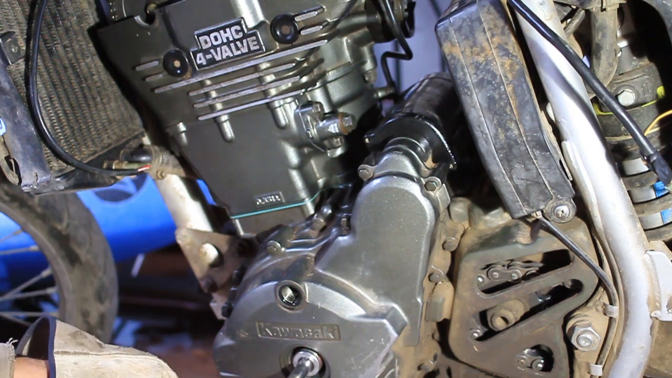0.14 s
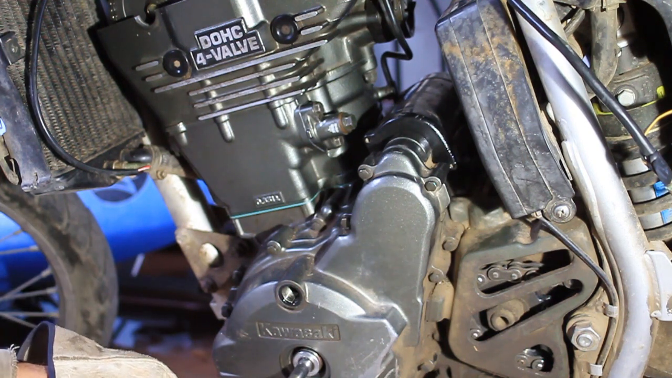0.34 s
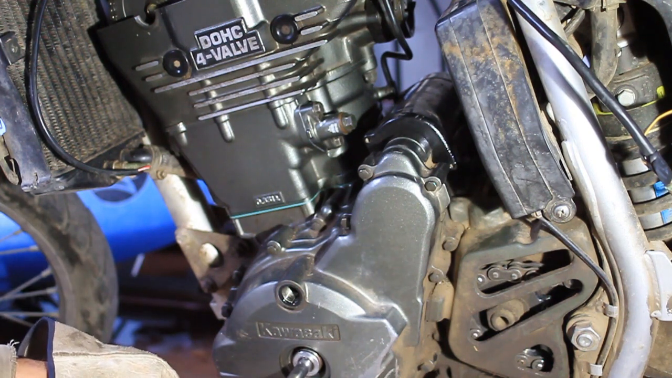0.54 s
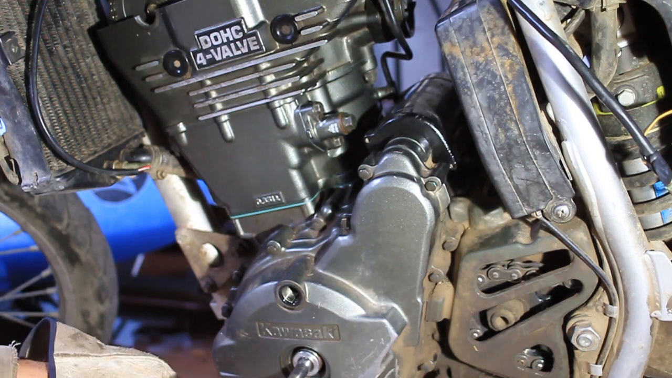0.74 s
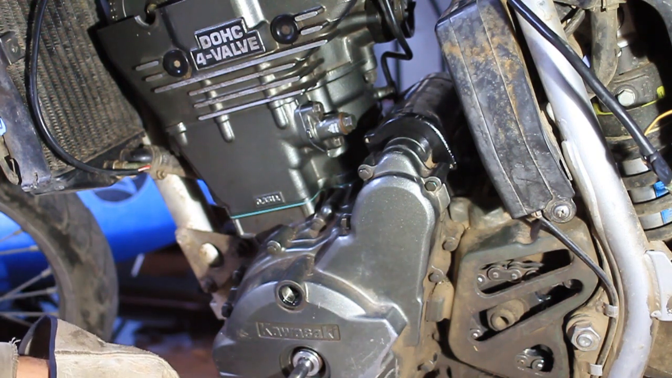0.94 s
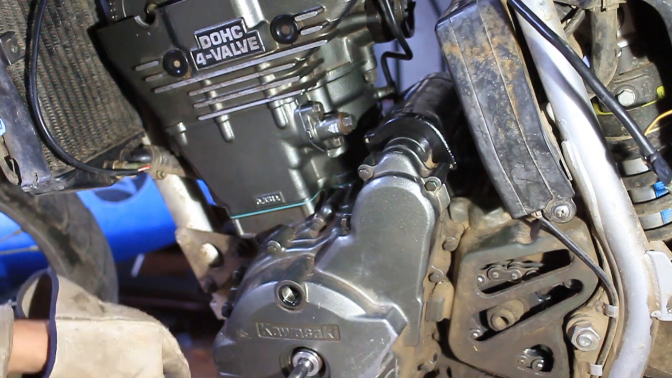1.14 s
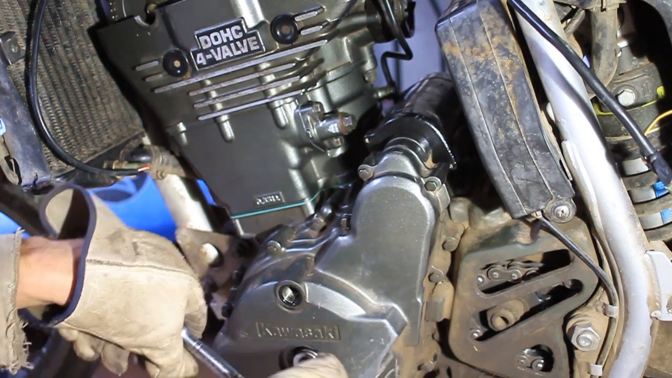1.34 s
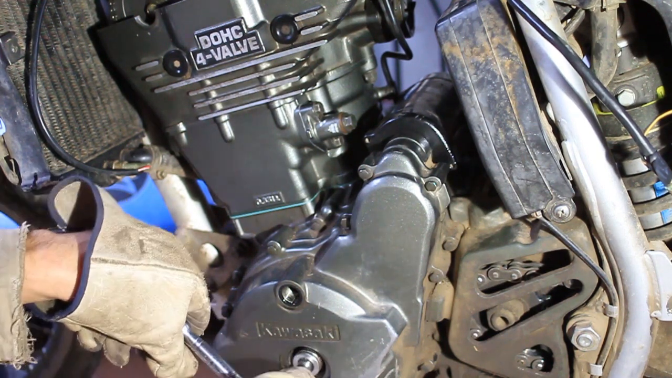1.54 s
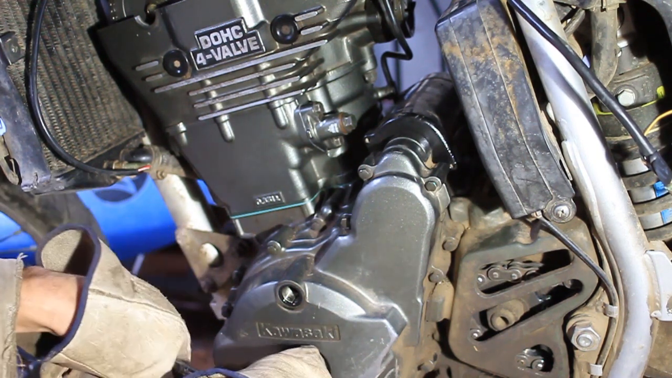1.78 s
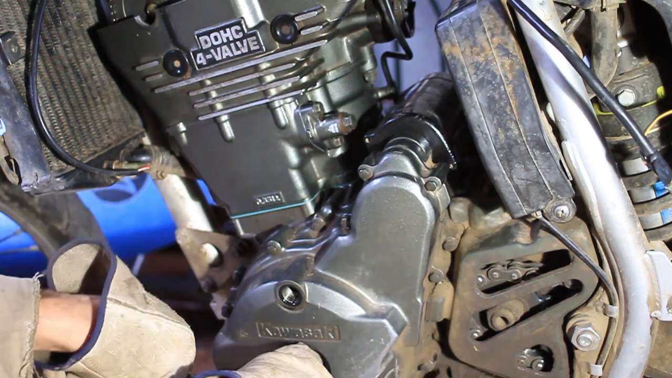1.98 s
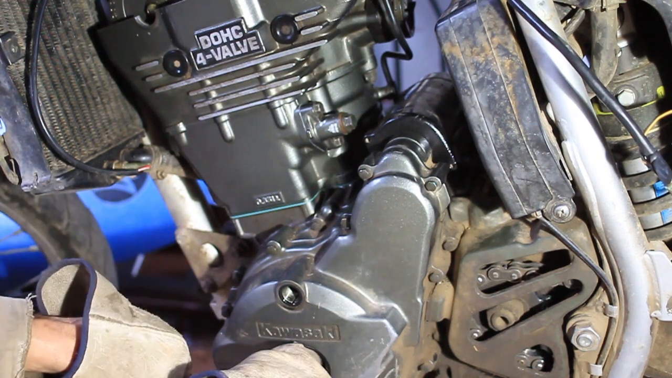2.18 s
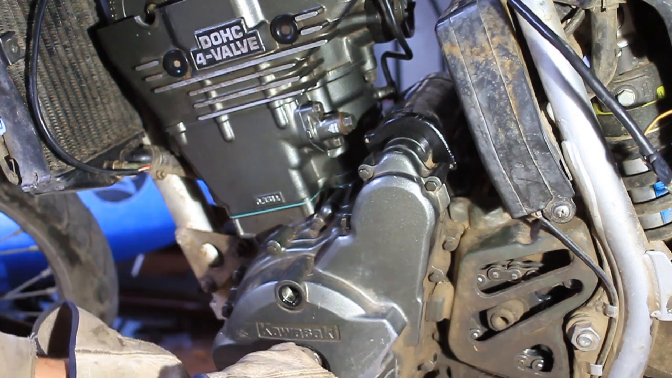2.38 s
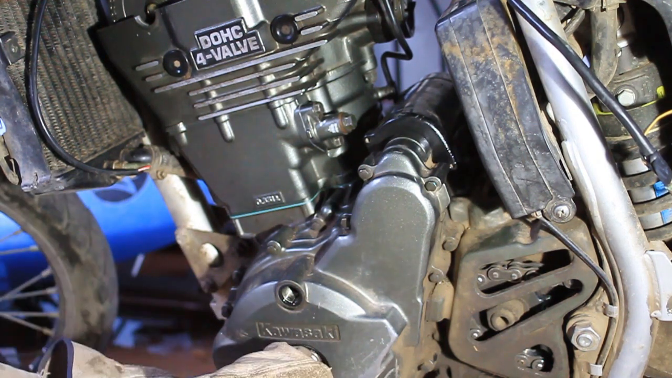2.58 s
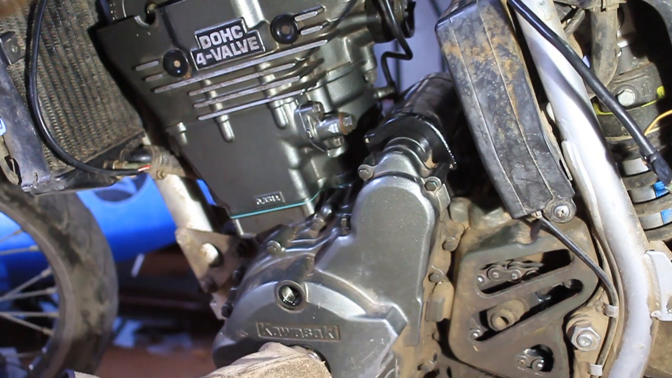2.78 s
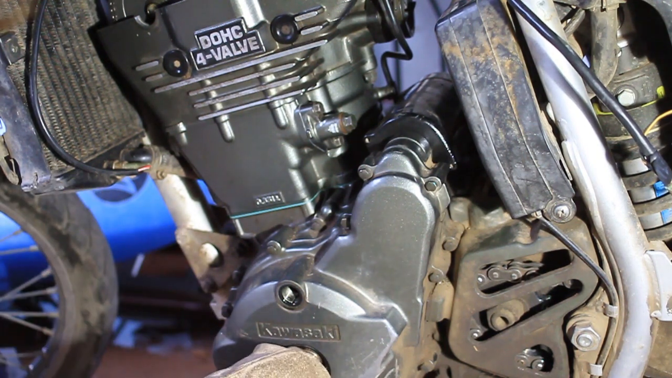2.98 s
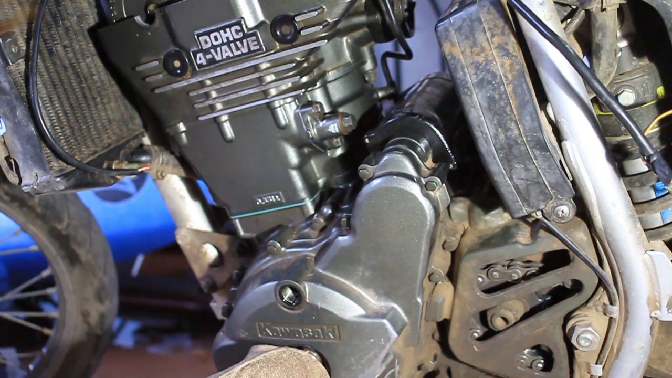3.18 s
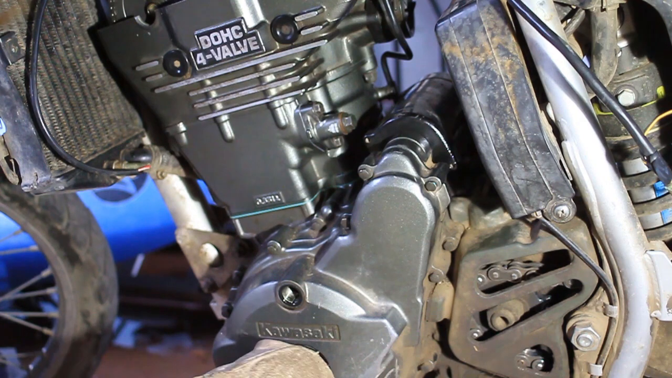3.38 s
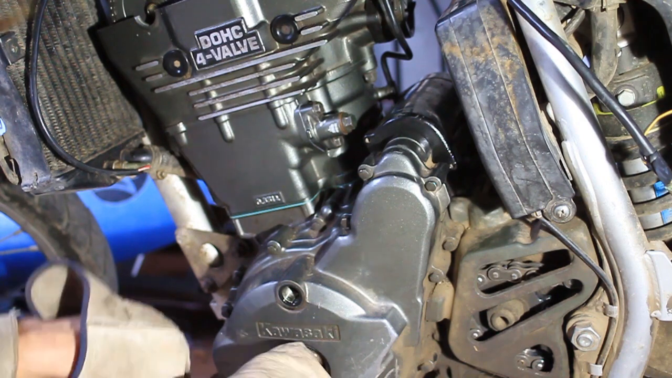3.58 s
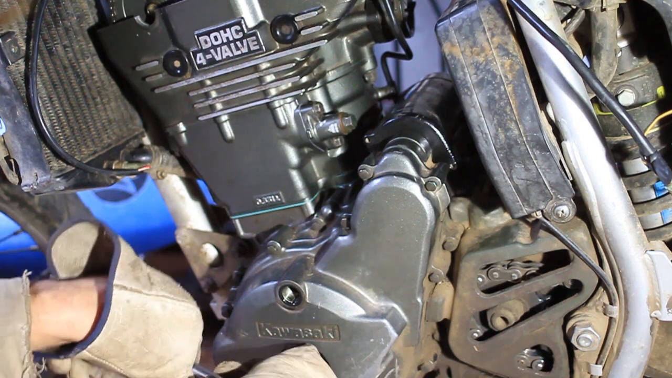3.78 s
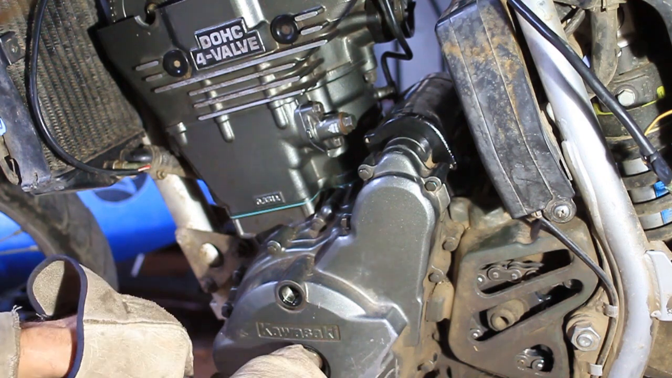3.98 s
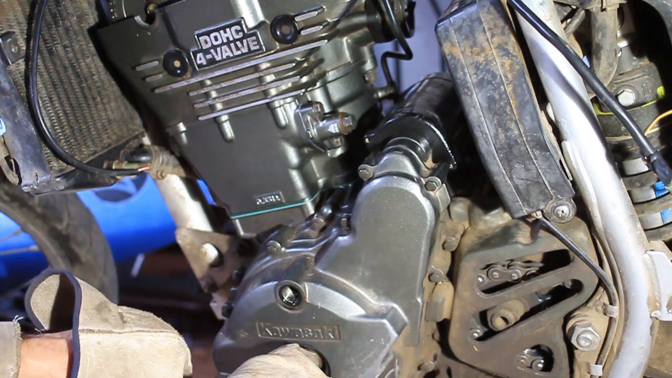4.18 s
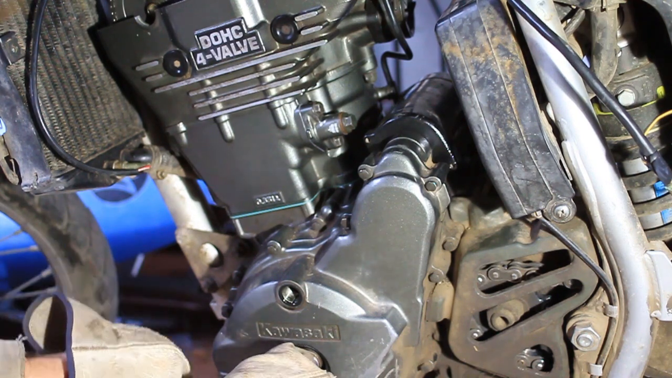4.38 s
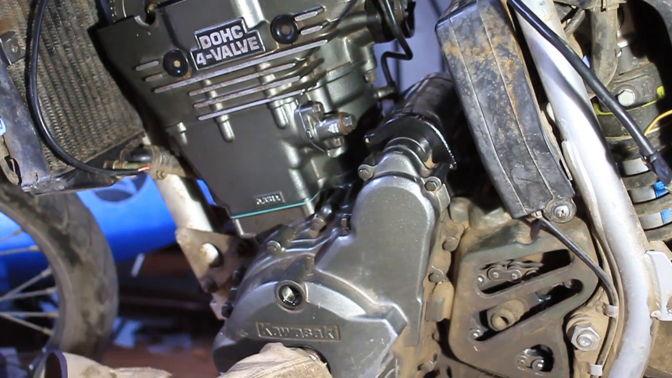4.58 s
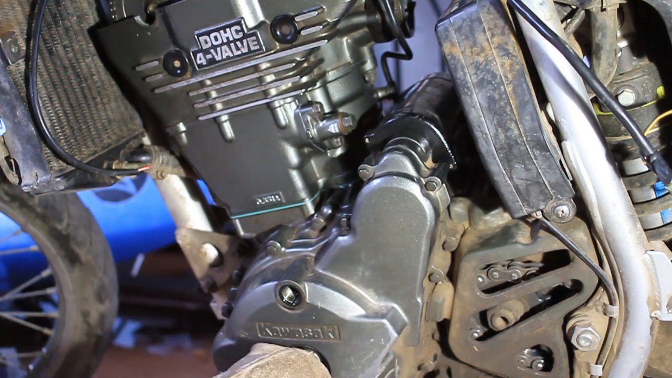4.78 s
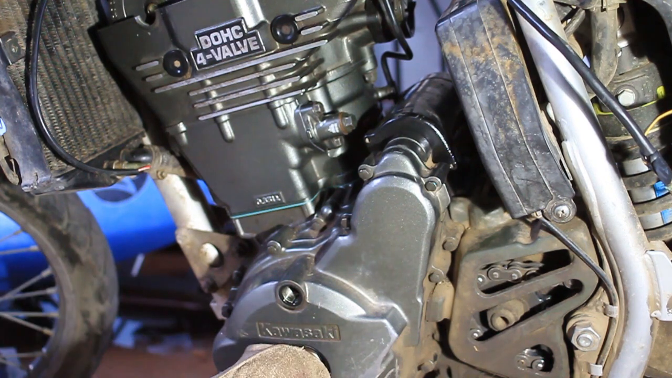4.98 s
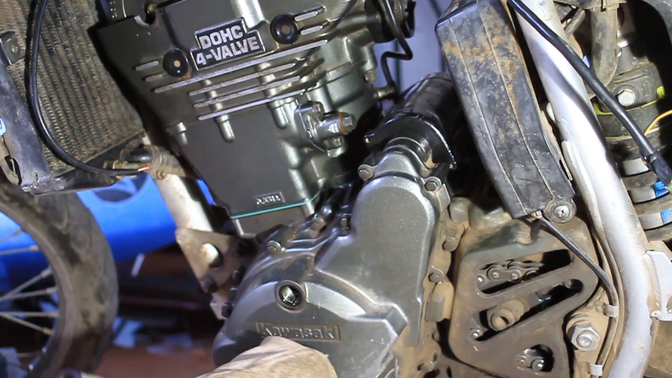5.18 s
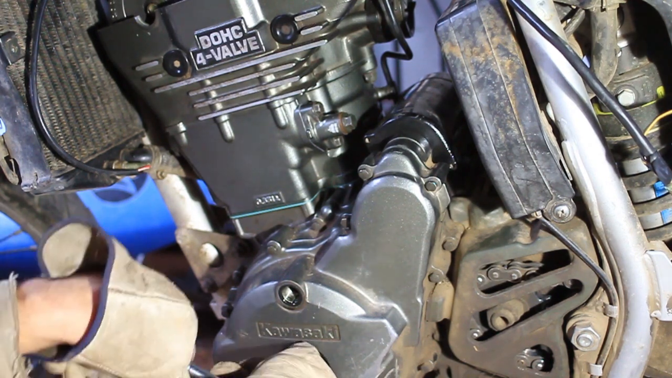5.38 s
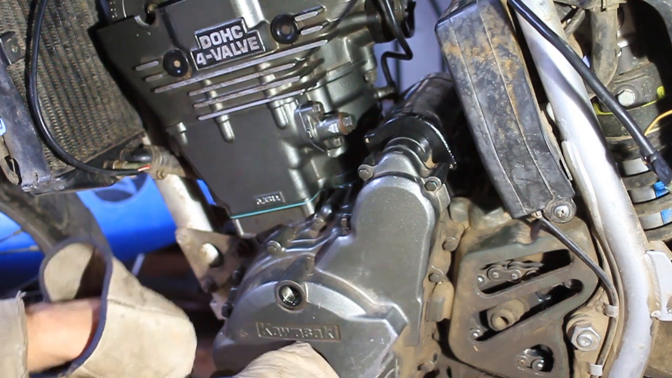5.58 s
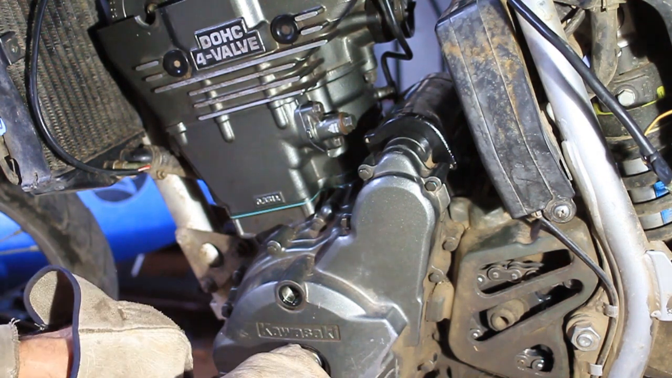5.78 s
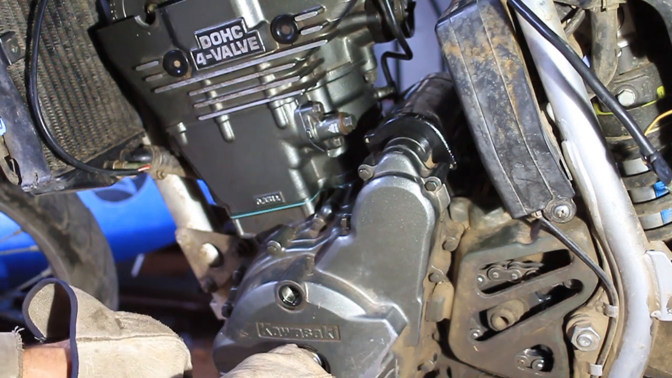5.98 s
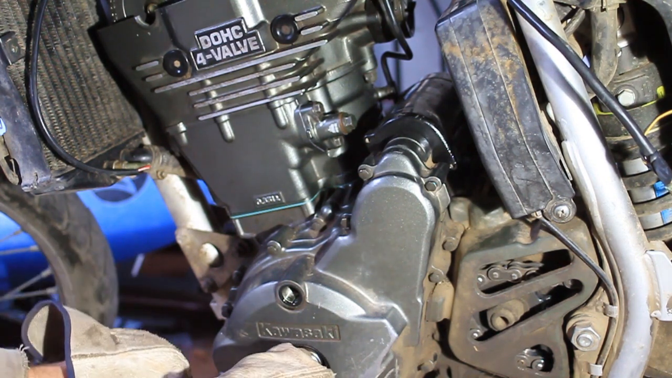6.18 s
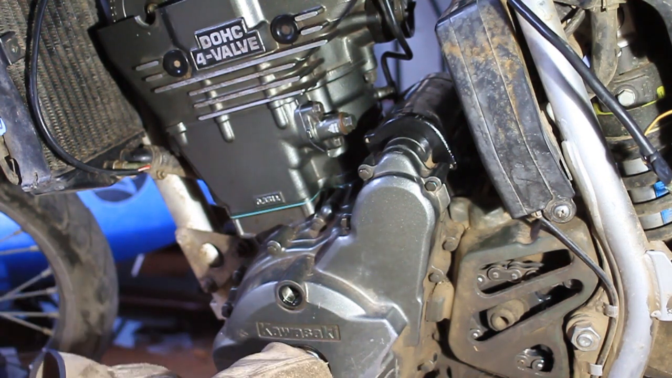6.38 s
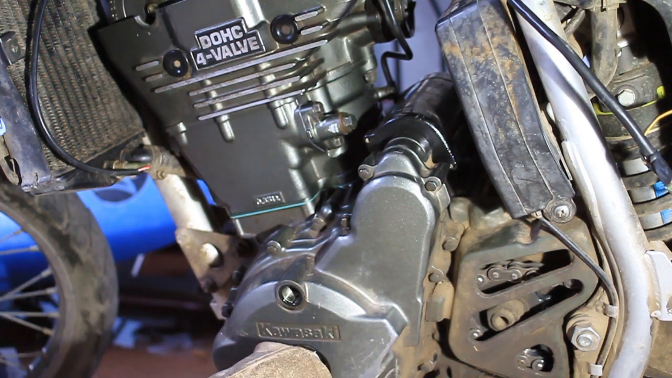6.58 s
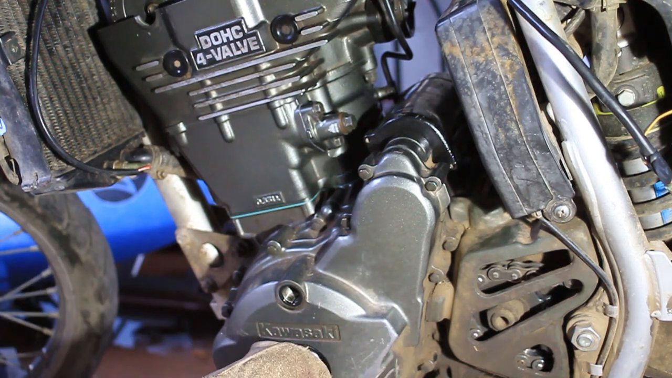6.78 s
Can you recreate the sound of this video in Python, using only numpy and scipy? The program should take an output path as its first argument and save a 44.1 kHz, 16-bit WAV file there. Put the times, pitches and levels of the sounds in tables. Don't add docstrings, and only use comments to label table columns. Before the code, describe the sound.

Soft far traffic rumble with slight microphone hiss runs throughout. From 0 s dry, gritty rubbing comes and goes as the engine turns, with tiny ticks around 0.7 s. At 1 s one loud, bright steel click snaps, followed from 1.1 to 1.5 s by about eight slower, quieter, uneven clicks. Scraping, a dull tap at 1.7 s and light ticks continue until about 3.2 s. A quick ratchet burst of eleven clicks runs from 3.5 to 3.75 s. Rubbing returns, with a tiny high dry squeak at 4.35 s. From 5.25 to 5.45 s the loudest rapid burst rises, and the level dips after it. A faint low motor hum enters at 5.5 s, a dull frame bump at 5.7 s, then a hard socket clack with short rattle at 5.85 s. Soft rubbing and ticks finish to 6.8 s. Close microphone, short garage echo.

```python
import sys
import numpy as np
from scipy import signal
from scipy.fft import rfft, irfft
from scipy.io import wavfile
from scipy.ndimage import minimum_filter1d

SR = 44100
rng = np.random.default_rng(int(sys.argv[2]) if len(sys.argv) > 2 else 0)


def amplitude_ratio(level_db):
    exponent = np.asarray(level_db, float) / 20
    return 10 ** exponent


def unload_wav(signal):
    wavfile.write(
        sys.argv[1],
        SR,
        np.round(np.clip(np.atleast_2d(signal).T, -1, 1) * 32767).astype(np.int16),
    )


N = 301644
TIME = np.arange(N) / SR

# time [s], peak level [dB], centre [Hz], spread [octaves]
KNOCK = (5.676, -22, 2200, 2.6)


def rms_one(x):
    return x / np.sqrt(np.mean(x ** 2) + 1e-20)


def at_peak(rows, peak_db):
    return rows * (amplitude_ratio(peak_db) / np.abs(rows).max(axis=1))[:, None]


def drift(rate_hz):
    r = np.exp(-2 * np.pi * rate_hz / SR)
    slow = signal.lfilter([1], [1, -2 * r, r * r], rng.standard_normal(N + SR))
    return rms_one(slow[SR:])


def envelope_db(start_s, length_s, start_db, end_db, rise_db_s, fall_db_s):
    end_s = start_s + max(length_s, 1e-4)
    hold_db = np.interp(TIME, [start_s, end_s], [start_db, end_db])
    rise_db = rise_db_s * np.maximum(start_s - TIME, 0)
    fall_db = fall_db_s * np.maximum(TIME - start_s - length_s, 0)
    return hold_db - rise_db - fall_db


def coloured(x, spectrum, peaks=()):
    hz = np.fft.rfftfreq(N, 1 / SR) + 1
    at_hz, level_db = np.transpose(spectrum)
    gain = amplitude_ratio(np.interp(np.log(hz), np.log(at_hz), level_db))
    gain = gain * (hz < 15850)
    for centre_hz, width_hz, top_db in peaks:
        offset = 2 * (hz - centre_hz) / width_hz
        gain = gain * (1 + (amplitude_ratio(top_db) - 1) / (1 + offset ** 2))
    return rms_one(irfft(rfft(x) * gain, N))


def contacts(count, rise_s, die_s):
    t = np.arange(768) / SR
    rise = (1 - np.exp(-t / np.reshape(rise_s, (-1, 1)))) ** 2
    bursts = rng.standard_normal((count, len(t))) * rise * np.exp(-t / die_s)
    return bursts / np.sqrt(np.sum(bursts ** 2, axis=1, keepdims=True))


def struck(modes, count, rise_s, die_s, scatter_db):
    out = np.zeros((count, 4096))
    for hz, level_db, t60_s in modes:
        r = amplitude_ratio(-60 / (t60_s * SR))
        w = 2 * np.pi * hz / SR
        force = contacts(count, rise_s, die_s)
        drive = np.abs(force @ np.exp(-1j * w * np.arange(force.shape[1])))
        drive = np.maximum(drive, 0.4)
        height = amplitude_ratio(level_db + scatter_db * rng.standard_normal(count)) / drive
        force = force * height[:, None]
        force = np.pad(force, ((0, 0), (0, out.shape[1] - force.shape[1]))) + 1e-18
        out += signal.lfilter([0.5, 0, -0.5], [1, -2 * r * np.cos(w), r * r], force)
    return out


def placed(times, bursts):
    out = np.full(N, 1e-18)
    for s, burst in zip(times, bursts):
        first = round(s * SR)
        out[first:first + len(burst)] += burst
    return out


def far_rumble():
    # frequency [Hz], level [dB per Hz]
    far_colour = [(18, -60), (30, -25), (59, -12.5), (251, -5), (294, -4.5), (335, -8), (735, -3),
                  (2270, -11), (3280, -19), (3830, -19), (4490, -21.5), (11800, -26), (15800, -34.5)]
    # centre [Hz], width [Hz], height [dB]
    drone = [(73.7, 8, 4.5), (100.3, 3.8, 7.5), (137.5, 10.8, 4.5), (211, 5.2, 2), (331.6, 4.4, 8),
             (463, 62, 5.5), (723.6, 10.3, 7), (1092, 150, 3)]
    # (time [s], level [dB])
    far_level = [(0, -44.5), (3.5, -45), (5.7, -44), (6.84, -45)]
    level_db = np.interp(TIME, *np.transpose(far_level)) - 0.5
    return amplitude_ratio(level_db) * coloured(rng.standard_normal(N), far_colour, drone)


def far_motor():
    start_s, hum_db, hum_hz, waver_hz = 5.52, -61, 176, 1.45
    level_db = envelope_db(start_s, N / SR, hum_db, hum_db, 100, 0) + 2.0 * drift(5)
    phase = 2 * np.pi * np.cumsum(hum_hz + waver_hz * drift(3)) / SR
    return np.sqrt(2) * amplitude_ratio(level_db) * np.sin(phase)


def washes():
    # (time [s], level [dB], time to fall by 60 dB [s])
    wash_starts = [
        (0, -51, 1),
        (5.839, -32, 0.4),
    ]
    # frequency [Hz], level [dB per Hz]
    wash_colours = [
        [(4120, -36), (7000, -10), (7460, -8), (10400, 11), (11700, -5), (12600, -12), (14000, -17)],
        [(2060, -45), (3500, -10), (3820, -19), (4950, 1), (5690, -12), (7850, -5), (8680, -11), (9910, 2),
         (11000, -12), (14600, -8), (15800, -25)],
    ]
    out = 0
    for (s, level_db, t60_s), colour in zip(wash_starts, wash_colours):
        closed = [(colour[0][0] / 2, -60)] + colour
        dying = amplitude_ratio(level_db - 60 * np.maximum(TIME - s, 0) / t60_s)
        out = out + (TIME >= s) * dying * coloured(rng.standard_normal(N), closed)
    return out


def rubbing():
    # start time [s], length [s], level at start [dB], at end [dB], bright
    # above dull part [dB]
    strokes = [(0, 0.25, -50.5, -59, 2), (.43, .24, -60.5, -56.5, -1), (0.68, 0.075, -53, -46.5, -7.5),
               (.76, 0.24, -49.5, -58.5, -6.5), (1.116, .08, -46.5, -61, -.1), (1.308, 0.14, -44, -66, -3),
               (1.56, 0.087, -58, -44, 0.5), (1.669, .15, -40, -55.5, -1), (1.846, 0.11, -46.5, -57, -2.3),
               (1.956, .15, -55.5, -49, -5), (2.292, 0.087, -57.5, -45.5, -3), (2.42, 0.16, -52, -51.5, -6),
               (2.625, .15, -51.5, -53, -5.5), (2.794, 0.39, -52.5, -50, -4), (3.8, 0.088, -65, -54.5, -1),
               (4.12, 0.07, -54, -56.5, -2.5), (4.39, .27, -47.5, -48, -3.5),
               (4.661, 0.26, -48.5, -43, -6.5), (5.514, 0.13, -47, -53, -18), (6.032, 0.27, -64, -49.5, -3),
               (6.304, 0.12, -51.5, -52.5, -4.5), (6.47, 0.34, -51, -50.5, -5.5),
               (0.332, 0.015, -51, -56, 1),
        (3.41, 0.14, -63, -56, .1),
        (5.075, .04, -62, -60, -1.5),
        (5.18, 0.075, -58, -54, -5),
        (5.72, 0.055, -55, -64, -6),
    ]
    # frequency [Hz], level [dB per Hz]
    dull_rub = [(350, -26), (600, -28), (638, -2), (1100, 2.5), (1750, -2), (2750, -2.5), (3480, -2),
                (4060, -0.5), (7000, -19.5), (9100, -45.5), (15400, -120)]
    bright_rub = [(2940, -43.5), (5000, 0.5), (6420, -1.5), (7140, -2), (8090, -3), (12100, -1.5),
                  (15100, -11), (15800, -14)]
    # centre [Hz], width [Hz], height [dB]
    casing = [(2700, 150, 6), (3140, 120, 4), (3760, 90, 6), (4600, 100, 5), (6550, 50, 9), (7590, 120, 5),
              (8280, 150, 3), (9540, 80, 6), (10300, 200, 5)]
    moves = strokes
    grip_on_db_s, let_go_db_s = 350, 171.5
    moves_db = np.array([envelope_db(*move[:4], grip_on_db_s, let_go_db_s) for move in moves])
    dull_db = moves_db.max(axis=0)
    bright_db = (moves_db + np.array(moves)[:, 4:]).max(axis=0)
    grip = drift(29.2)
    slips_db = 2.0 * np.minimum(rng.exponential(1, (2, N)), 5)
    grit = rng.standard_normal((2, N)) * amplitude_ratio(slips_db)
    dull_gain = amplitude_ratio(dull_db + 1.64 * grip + 0.19 * drift(12))
    bright_gain = amplitude_ratio(bright_db + 0.74 * grip + 1.9 * drift(22))
    dull = dull_gain * coloured(grit[0], dull_rub, casing)
    bright = bright_gain * coloured(grit[1], bright_rub, casing)
    return dull + bright


def squeak():
    start_s, level_db, hz, width_hz = 4.358, -51, 7530, 90
    narrow = signal.iirpeak(hz, hz / width_hz, fs=SR)
    tone = signal.lfilter(*narrow, rng.standard_normal(N))
    tone = signal.lfilter(*narrow, tone)
    return amplitude_ratio(envelope_db(start_s, 0, level_db, level_db, 570, 140)) * rms_one(tone)


def ticks():
    # time [s], peak level [dB], centre [Hz], spread [octaves]
    dull_ticks = [(0.9796, -6.5, 4150, 0.59), (0.7103, -34, 1830, 1.7), (0.7435, -27.5, 4980, 1),
                  (1.6697, -17.5, 3900, 0.74), (1.705, -27, 1640, 1.1), (2.0418, -35, 3930, 0.84),
                  (2.3147, -37, 2760, 1.2), (3.5058, -20.5, 1900, 2.6), (3.8898, -36, 1810, 1.2),
                  (4.42, -33, 2880, 1.2), (4.793, -35, 3150, 1.1), (4.9094, -34, 3710, 1.4),
                  (5.1093, -31.5, 1570, 1.2), (5.6527, -31.5, 1640, 0.49), (6.3082, -32, 2260, 1.7),
                  (6.35, -33.5, 2850, 1.8)]
    bright_ticks = [(0.6884, -29, 6160, 1.2), (1.5798, -43, 6900, 1.2), (2.107, -34, 6560, 2.2),
                    (2.5311, -38, 10300, 1.2), (2.6233, -36, 6560, 1.4), (4.3794, -38, 7610, 1.01),
                    (4.4557, -32.5, 6550, 1.6), (4.536, -38, 7710, 0.85), (4.6374, -30, 10300, 1),
                    (4.9791, -33.5, 13500, 1.01), (5.0799, -40, 6900, 1.4), (5.676, -39, 10900, 1.9),
                    (6.124, -42, 7450, 1.2), (6.1439, -42, 12500, 1.2), (6.2193, -36.5, 6700, 1.2),
                    (6.4894, -38, 5720, 1.5), (6.6667, -41, 12900, 1.04), (6.684, -28.5, 12900, 0.34)]
    rows = [(*tick, 0.0019) for tick in dull_ticks]
    rows += [(*KNOCK, 0.006)]
    rows += [(*tick, 0.003) for tick in bright_ticks]
    puffs = []
    for s, peak_db, hz, octaves, die_s in rows:
        edges = hz * 2 ** (np.clip(octaves, 0.1, 3) * np.array([-0.5, 0.5]))
        edges = np.clip(edges, 200, [15000, 15700])
        band = signal.butter(2, edges, "band", fs=SR, output="sos")
        puff = signal.sosfilt(band, contacts(1, 0.000067, die_s)[0])
        puffs.append(amplitude_ratio(peak_db - 1.5) * puff / np.abs(puff).max())
    return placed(np.array(rows)[:, 0], puffs)


def frame_knock():
    # pitch [Hz], level [dB], time to fall by 60 dB [s]
    frame_modes = [(720, -3, .03), (1030, 0, .03), (2010, -2, .025), (2900, -6, .01), (3800, -5, .01)]
    ring = struck(frame_modes, 1, 0.002, 0.004, scatter_db=0)
    return placed([KNOCK[0]], at_peak(ring, np.array([-25])))


def socket_seat():
    # (time [s], peak level [dB])
    jumps = [
        (5.8356, 1),
    ]
    seat_hz = [2600, 3300, 4350, 5000, 5900, 7200, 8100, 9500, 10050, 10800, 11600, 12200, 12800, 13400,
               14000, 14700]
    # level [dB], time to fall by 60 dB [s]
    seat_modes = [(-9, 0.005), (-6, 0.005), (-9, 0.016), (-1.5, 0.028), (-20, 0.0081), (-12, 0.012),
                  (-13, .008), (0, 0.016), (-18, 0.016), (2, 0.0054), (6, 0.016), (-7, 0.0081), (1, 0.01),
                  (-10, .008), (-6, .009), (-15, 0.0069)]
    s, peak_db = np.transpose(jumps)
    modes = [(hz, *mode) for hz, mode in zip(seat_hz, seat_modes)]
    blow = at_peak(struck(modes, len(s), 0.0004, 0.00071, 0), peak_db + 0.18)
    rattle = at_peak(struck(modes, len(s), 0.0013, 0.0026, 0), peak_db - 6.5)
    return placed(s, blow + rattle)


def ratchet():
    # time [s], peak level [dB], handle ring from the peak [dB]
    swings = [
        [(0.9802, 3.2, -9.5)],
        [(1.1298, -17.5, -2.5), (1.189, -34, 10), (1.2271, -30.5, 4), (1.29, -31, -1), (1.3239, -16, -14),
         (1.3654, -14, -16.5), (1.401, -14.5, -18.5), (1.4373, -12, -25), (1.5424, -30.5, -50)],
        [(3.5057, -11, -22), (3.5299, -10, -26), (3.5505, -13.5, -22), (3.5718, -11.5, -24), (3.5917, -17, -25),
         (3.612, -14, -30), (3.6352, -14, -32), (3.6576, -14, -32), (3.6809, -15.5, -24), (3.7071, -21, -28),
         (3.7562, -24, -29)],
        [(5.237, -8.5, -27), (5.2617, -7.5, -50), (5.2824, -5.5, -53), (5.3007, -2, -56), (5.3188, -2.5, -56),
         (5.3374, 1.5, -52), (5.3557, 3, -56), (5.3757, 1.5, -60), (5.3978, 3.5, -50), (5.4235, 3, -56),
         (5.462, 1.8, -52)],
    ]
    # level at first tooth [dB], at last tooth [dB]
    grips = [
        [(-14.5, -21), (-1.5, -8), (-8.5, -13)],
        [(-6, -27), (-1.5, -20), (-12, -27.5)],
        [(-28, -21), (-4.5, -25), (-9.5, -25)],
        [(-18, -17.5), (-15, -16), (-9, -16.5)],
    ]
    part_hz = [
        [4070, 4200],
        [7472, 7590],
        [9780, 9950, 10150, 10350],
        [11480, 11660, 11880, 12080],
    ]
    # level [dB], time to fall by 60 dB [s]
    part_modes = [
        [(1.5, 0.035), (-1.5, 0.02)],
        [(-4.3, 0.037), (-2.4, 0.018)],
        [(-5, 0.0083), (-1.5, 0.016), (-2.5, .02), (-1.5, .015)],
        [(-24.5, .015), (3, 0.017), (-13, 0.06), (0, 0.011)],
    ]
    head_hz = [1750, 2450, 3200, 4650, 5250, 6200, 7000, 8300, 9100, 10800, 12700, 13800, 15070, 15450]
    # time to fall by 60 dB [s], levels on swings 1-4 [dB]
    head_modes = [(0.0055, -44, -29, -13, -24.5), (0.0055, -14, -45, -33, -10.5),
                  (0.0087, -11, -34, -29, -23), (0.0046, -14, -35, -12.5, -21),
                  (0.0065, -15, -34, -14, -9.5), (0.0099, -36, -14, -11.5, -15),
                  (0.01, 1.5, -19, -14, -9.5), (0.0084, -24, -13, -12, -10.5), (0.005, -22, -22, -24, -30),
                  (0.0017, 2, 3.5, -13, -6), (0.0036, -46, -13, -21, -16), (0.0133, -34, -19, -19, -25),
                  (.024, 0, -25, -14, -37), (.01, -28, -22, -27, -18)]
    contact_rise_s, contact_die_s = [0.001, 0.00031, 0.00025, 0.00025], 0.00094
    s, peak_db, handle_db = np.transpose(np.concatenate(swings))
    swing = np.repeat(np.arange(len(swings)), [len(teeth) for teeth in swings])
    grip_db = [np.linspace(*np.transpose(grip), len(teeth)) for grip, teeth in zip(grips, swings)]
    grip_db = np.concatenate(grip_db)
    modes = []
    for hz, (t60_s, *level_db) in zip(head_hz, head_modes):
        modes.append((hz, np.array(level_db)[swing], t60_s))
    for freedom_db, pitches, part in zip([handle_db, *grip_db.T], part_hz, part_modes):
        for hz, (level_db, t60_s) in zip(pitches, part):
            modes.append((hz, freedom_db + level_db + 8.5, t60_s))
    rise_s = np.array(contact_rise_s)[swing]
    snaps = struck(modes, len(s), rise_s, contact_die_s, scatter_db=0.0)
    return placed(s, at_peak(snaps, peak_db + 1.0))


def garage(x):
    # (delay time [s], level [dB])
    bounces = [
        (.0038, -11.5),
        (.0085, -22),
        (0.0234, -16),
        (0.059, -23),
    ]
    t60_s, tail_db = 0.33, -14.5
    t = np.arange(SR) / SR
    tail = rng.standard_normal(SR) * amplitude_ratio(-60 * t / t60_s) * (1 - np.exp(-t / 0.018))
    response = amplitude_ratio(tail_db) * tail / np.sqrt(np.sum(tail ** 2))
    for delay_s, level_db in bounces:
        smear = contacts(1, 0.00033, 0.00046 + 0.04 * delay_s)[0]
        first = round(delay_s * SR)
        response[first:first + len(smear)] += amplitude_ratio(level_db) * smear
    response = signal.sosfilt(signal.butter(1, 14000, fs=SR, output="sos"), response)
    response = signal.sosfilt(signal.cheby2(10, 40, 15900, fs=SR, output="sos"), response)
    return signal.fftconvolve(x, response)[:N]


def scene():
    steel = ratchet() + socket_seat()
    no_bass = signal.butter(4, 1450, "high", fs=SR, output="sos")
    hits = signal.sosfilt(no_bass, steel) + ticks() + frame_knock()
    background = far_rumble() + far_motor() + washes()
    return (background + rubbing() + squeak() + hits + garage(hits))[None]


def top_cut(x):
    return signal.sosfilt(signal.butter(12, 16800, fs=SR, output="sos"), x)


def record(dry):
    duck_from_db, duck_share = -7.5, 0.68
    attack_s, hold_s, recover_db_s = 0.0026, 0.059, 93
    ramp_db = recover_db_s * np.arange(N) / SR
    hold = round(hold_s * SR / 2)
    quiet_db = -20 * np.log10(np.abs(dry[0]) + 1e-9)
    level_db = -minimum_filter1d(quiet_db, size=2 * hold + 1, origin=hold)
    held_db = np.maximum.accumulate(level_db + ramp_db) - ramp_db
    r = np.exp(-1 / (attack_s * SR))
    duck_db = signal.lfilter([1 - r], [1, -r], duck_share * np.maximum(held_db - duck_from_db, 0))
    ducked = np.clip(dry * amplitude_ratio(-duck_db), -1, 1)
    mix = signal.sosfilt(signal.cheby2(12, 45, 17000, fs=SR, output="sos"), ducked)
    return top_cut(mix)


dry = scene()
out = record(dry)
unload_wav(out)
```